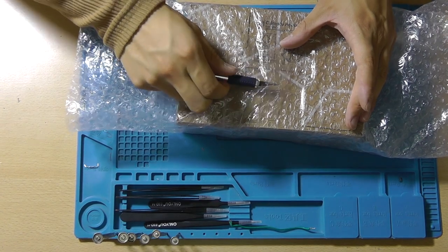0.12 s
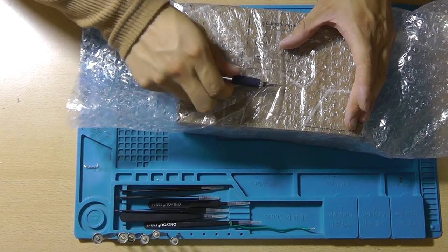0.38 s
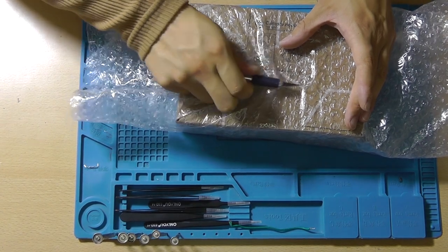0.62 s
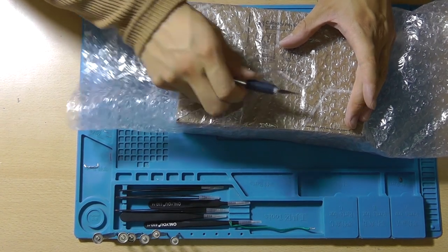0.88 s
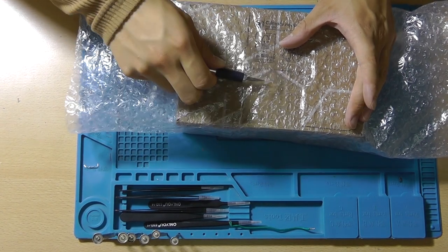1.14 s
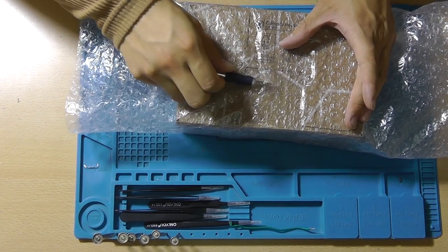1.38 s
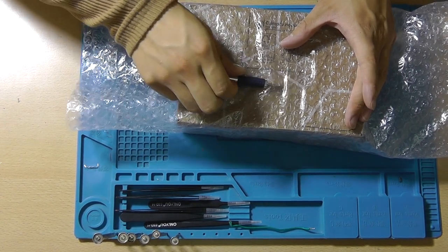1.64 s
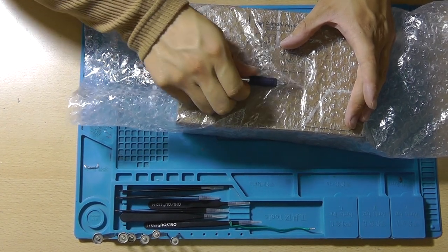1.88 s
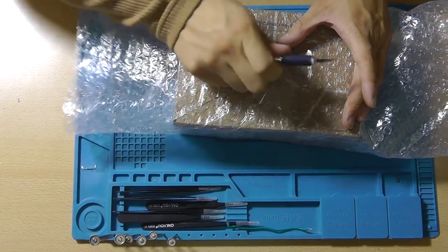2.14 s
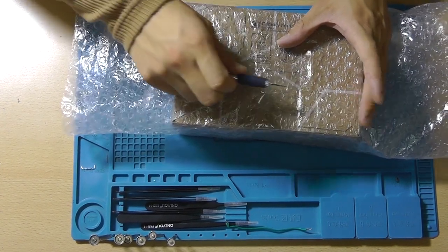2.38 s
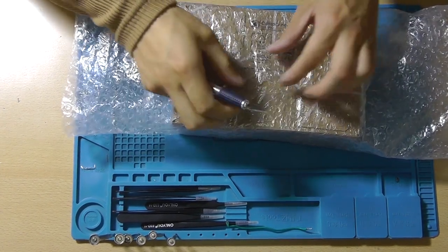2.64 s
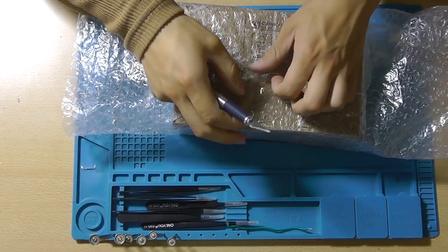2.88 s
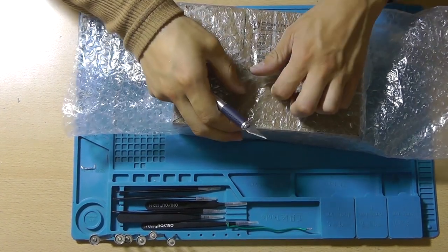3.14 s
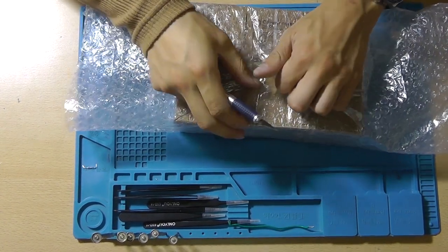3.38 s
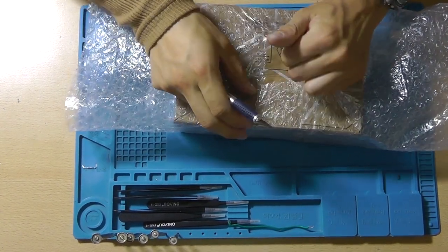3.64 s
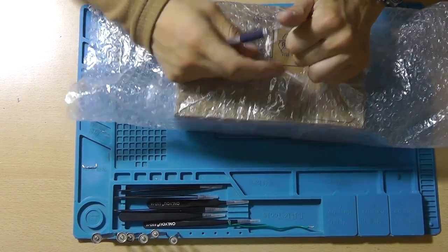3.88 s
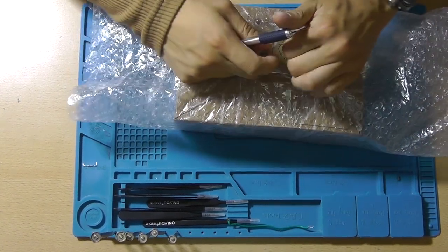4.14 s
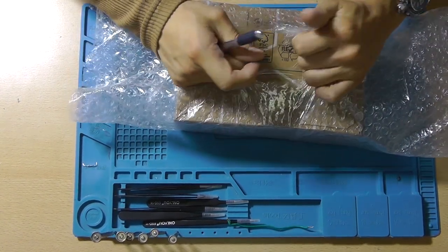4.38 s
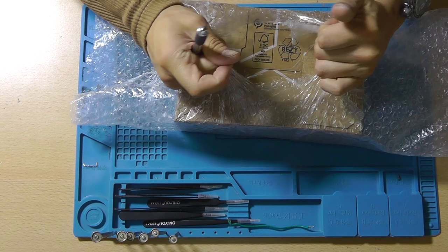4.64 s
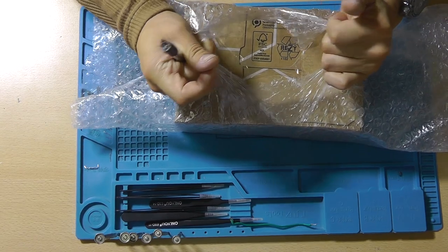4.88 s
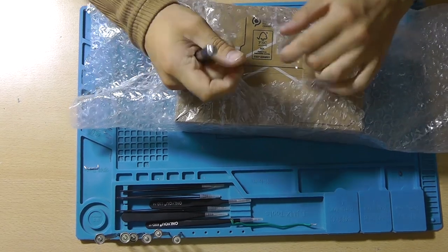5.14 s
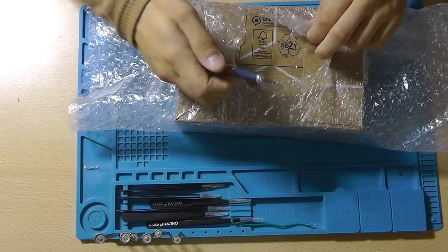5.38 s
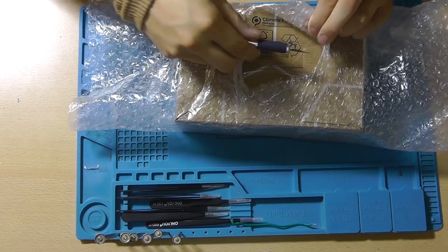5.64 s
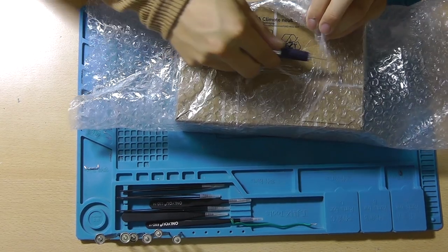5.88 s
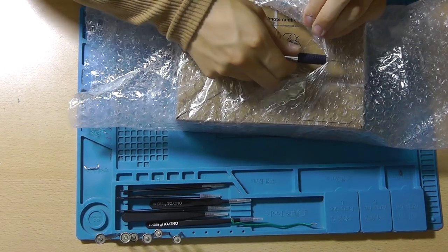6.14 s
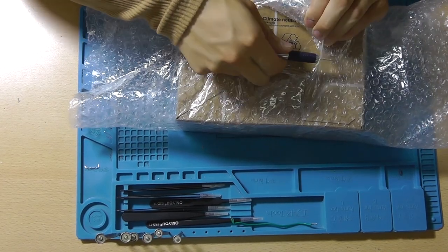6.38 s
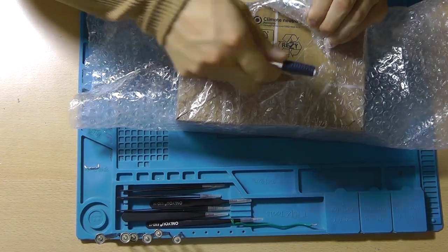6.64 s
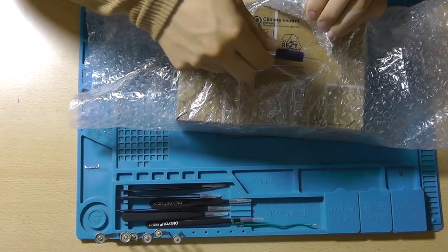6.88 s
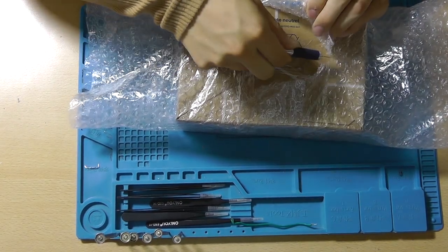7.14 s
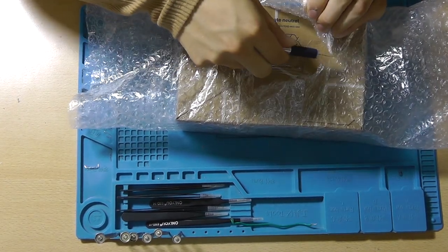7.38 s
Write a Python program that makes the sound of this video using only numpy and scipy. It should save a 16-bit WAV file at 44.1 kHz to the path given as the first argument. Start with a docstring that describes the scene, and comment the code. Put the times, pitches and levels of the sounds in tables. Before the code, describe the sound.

Close, crisp plastic crinkling in uneven clumps, broken by loud pops, two quick knife tears and a tiny squeak, in a small quiet room.

```python
"""Film of bubble wrap crinkles in clumps of tiny buckles, each ringing a patch of film for a few cycles.
Hands press, pull and slit it round a cardboard box on a desk: fractures snap and tear, a stick-slip
squeak sounds once, and the hollow box answers with decaying modes. The loudest snaps overload the input.
Behind: a small room's noise-tail reflections, low desk swings, noise with two hums, a thin sine whine."""
import sys
import numpy as np
from scipy import signal
from scipy.fft import rfft, irfft
from scipy.io import wavfile

SR = 44100
rng = np.random.default_rng(int(sys.argv[2]) if len(sys.argv) > 2 else 0)


def makeup_ratio(level_db):
    """Linear amplitude ratio for a level in decibels (20 dB per factor of ten)."""
    decades = np.asarray(level_db, float) / 20
    return 10 ** decades


def dump(signal):
    """Clip the signal to [-1, 1] and save it as 16-bit WAV at the path in sys.argv[1]."""
    limited = np.clip(np.atleast_2d(signal).T, -1, 1)
    pcm = np.round(limited * 32767).astype(np.int16)
    wavfile.write(sys.argv[1], SR, pcm)


N = 331057

# modes of the box: f/Hz, relative level/dB, full t60/s
BOX_MODES = [(183, -2, .06), (300, -2, .04), (400, -1, .09), (550, 0, .028), (730, -5, .02),
             (950, -4, .025)]


def in_time(rows):
    """Columns of a table, joined by straight lines, one value a sample."""
    s, *columns = np.transpose(rows)
    return [np.interp(np.arange(N) / SR, s, c) for c in columns]


def rms_one(x):
    """Scale to rms 1."""
    return x / np.sqrt(np.mean(x ** 2) + 1e-20)


def at_hz(points, hz):
    """Read a spectrum on a log-frequency axis."""
    points_hz, points_db = np.transpose(points)
    return np.interp(np.log(hz), np.log(points_hz), points_db)


def drift(corner_hz):
    """Slow random wander of rms 1: noise through two equal poles, run at SR / 20."""
    r = np.exp(-40 * np.pi * corner_hz / SR)
    noise = rng.standard_normal(N // 20 + 2002)
    slow = signal.lfilter([1], [1, -2 * r, r * r], noise)[2000:]
    return np.interp(np.arange(N) / 20, np.arange(len(slow)), rms_one(slow))


def ring(clicks, hz, t60_s):
    """Two-pole resonance: a unit click sets a decaying sine of starting height 1 ringing."""
    r = makeup_ratio(-60 / (t60_s * SR))
    w = 2 * np.pi * min(hz, 18000) / SR
    return signal.lfilter([0, np.sin(w)], [1, -2 * r * np.cos(w), r * r], clicks + 1e-18)


def buckles(per_s, spread_db, clump_db):
    """Random clicks of very uneven size that come in clumps."""
    sizes = makeup_ratio(spread_db * np.minimum(rng.exponential(1, N), 5)) * rng.choice([-1, 1], N)
    chance = per_s * makeup_ratio(clump_db * drift(50)) / SR
    return sizes * (rng.random(N) < chance)


def handling():
    """Powers of steady handling and swelling, fading squeezes add: crinkle dB, brightness, rustle dB."""
    # steady handling of the wrap: t/s, crinkle level/dB, brightness/(dB/octave)
    steady = [(0.0, -37.5, -2.5), (0.3, -44, -3), (0.41, -34.5, -2), (0.64, -33.5, -9), (0.87, -49, -3),
              (1.05, -50, -11), (1.19, -48, -11), (1.24, -41, -2.5), (1.6, -38, -2), (2.06, -40.5, -3),
              (2.27, -48, 0.5), (2.55, -40, -7.5), (2.76, -56.5, -9.5), (2.81, -35.5, -1), (3.2, -39, -3),
              (3.4, -35.5, -6.5), (3.99, -35, -5), (4.2, -28, -3.5), (4.87, -34, -3.5), (5.79, -39, -3),
              (6.35, -38, -1), (6.79, -43, -2.5), (7.06, -44, -6.5), (7.5, -40, 0.5)]
    # fingers squeeze or tug: t/s, crinkle level/dB, 10 dB fade/s, brightness/(dB/octave), rustle level/dB
    squeezes = [(0.2, -39, 0.06, -6.5, -45), (0.72, -32, 0.17, 0, -47), (0.95, -29, 0.01, -5, -63),
                (1.819, -32.5, 0.17, -3, -46.5), (2.16, -41.5, 0.16, -8, -42),
                (2.628, -35.5, .08, -1.5, -52), (2.842, -29, 0.04, -8, -35), (3.045, -25.5, 0.06, -7, -42),
                (3.291, -25.5, 0.0744, -2.5, -36), (3.418, -31, 0.03, -4.5, -40.5),
                (3.528, -22, 0.1067, -4, -52), (3.696, -23, 0.0528, -6, -49),
                (3.88, -25.5, 0.12, -1.5, -57), (4.13, -26, 0.02, 0, -42), (4.29, -27.5, 0.07, -7, -61),
                (4.459, -26, 0.08, -1.2, -62), (4.701, -26.5, 0.14, 0, -48), (4.601, -31, 0.05, -1, -66),
                (4.99, -34, 0.04, 0.5, -68), (5.208, -26, 0.1, -5, -43.5), (5.381, -29.5, 0.08, -3.5, -49),
                (5.64, -32.5, 0.18, -4, -54), (6.08, -29.5, 0.16, -9.5, -55)]
    rise_share = 0.72   # rise time over fade time
    drag_db = -21   # rustle against steady crinkle
    t = np.arange(N) / SR
    steady_db, tilt = in_time(steady)
    film_power = makeup_ratio(2 * steady_db)
    box_power = makeup_ratio(2 * (steady_db + drag_db))
    tilt = tilt * film_power
    for s, db, fade_s, brightness, box_db in squeezes:
        shape = makeup_ratio(-20 * np.maximum(t - s, (s - t) / rise_share) / fade_s)
        squeeze_power = makeup_ratio(2 * db) * shape
        film_power = film_power + squeeze_power
        box_power = box_power + makeup_ratio(2 * box_db) * shape
        tilt = tilt + brightness * squeeze_power
    return 10 * np.log10(film_power), tilt / film_power, 10 * np.log10(box_power)


def crinkle(level_db, brightness):
    """Buckles ring patches of film for a few cycles; harder handling, more buckles."""
    # film spectrum: f/Hz, relative level/(dB per Hz)
    film_spectrum = [(410, -37), (700, -27), (1500, -10.5), (2190, -21), (2630, -8.5), (6320, -11),
                     (8100, -1.5), (9600, -18.5), (13300, -16), (16000, -26)]
    # taut film breaks into lone creases, loose film rustles densely: t/s, crispness/dB
    crispness = [(0.0, 4), (2.7, 4), (2.85, -4), (5.6, -4), (5.9, 3), (7.5, 4)]
    crisp_db, = in_time(crispness)
    per_s = 3000 * makeup_ratio(.6 * (level_db + 36) - crisp_db)
    clicks = rms_one(buckles(per_s, spread_db=3.6, clump_db=2.8) / np.sqrt(per_s))
    creases = rms_one(buckles(per_s=55, spread_db=3.0, clump_db=3.0))
    ticks = .24 * makeup_ratio(crisp_db) * creases   # lone creases crack across the whole sheet
    pitches_hz = np.geomspace(800, 15000, 22)
    dealt = rng.integers(0, len(pitches_hz), N)
    out, power = 0, 0
    for k, hz in enumerate(pitches_hz):
        struck = clicks * (.11 + (dealt == k)) + ticks   # own buckles, a share of all, creases
        patch = rms_one(ring(struck, hz, 6.0 / hz)) * (-1) ** k
        gain = np.sqrt(hz) * makeup_ratio(at_hz(film_spectrum, hz) + brightness * np.log2(hz / 3000))
        patchy = makeup_ratio(2.2 * drift(15))
        out = out + gain * patchy * patch
        power = power + gain ** 2
    return makeup_ratio(level_db) * out / np.sqrt(power)


def snaps():
    """A snap is a few quick fractures that ring the film, tick in the treble and knock the box."""
    # film snaps: t/s, peak/dB, film f/Hz, treble tick/dB re film ring, box knock/dB re snap
    single = [(0.192, -18, 2840, -23, -22), (0.3824, -17.5, 2820, -19, -9.5),
              (0.3987, -11.5, 3160, -29, -17.5), (0.4473, -14.5, 3000, -13, -36),
              (0.4719, -9.5, 4000, -27, -2.5), (0.4855, -17, 4010, -26, -17),
              (0.5083, -3.5, 5070, -31, -11.5), (0.5187, -3.5, 4230, -31, -34),
              (0.5645, 1.5, 3070, -46, -6.5), (0.6617, -20, 2860, -12, -17),
              (0.7017, -7.5, 2820, -22, -16.5), (0.802, -19, 3340, -29, -5),
              (1.233, -16.5, 4160, -7.5, -20), (1.381, -18.5, 4800, -15, -23), (1.49, -19, 3250, -2.5, -11),
              (1.627, -12, 5870, -36, -13), (1.7257, -14.5, 5370, -21, -8.5), (1.737, -14, 3130, -1, -8),
              (1.803, -18, 2900, -8, -6.5), (1.9397, -21, 3600, 3, -26), (2.102, -12.5, 2720, -13, -13),
              (2.1175, -16, 2830, -23, -1), (2.3064, -23.5, 1010, -4, -6), (2.8567, -15, 1010, -10, -9),
              (2.9985, -15, 1220, -11, -18), (3.088, -25, 3000, 2, -25), (3.056, -13.5, 2810, -7, -4.5),
              (3.2463, -12.5, 4370, 5, -19), (3.279, -10.5, 3400, 0, -14), (3.2915, -13, 5570, -7, -26),
              (3.4152, -7, 3940, -14, -16), (3.5994, -5, 3100, 1.5, -24), (3.6923, -2.5, 1000, -3, -12),
              (3.6995, -7.5, 3080, -18, -6.5), (3.8405, -13, 2580, -3, -12), (3.9302, -18, 5400, -10, -34),
              (3.9705, -20, 6530, -2, -27), (3.7032, -8.5, 3170, -5, -6.5), (4.1112, -11, 3000, 0, -34),
              (4.1232, -15, 3500, -10, -26), (4.153, -21, 6500, -4, -28), (4.2437, -10, 2600, -5, -31),
              (4.2762, -10.5, 2630, -8, -20), (4.412, -12.5, 2890, 2, -33), (4.5459, -12.5, 3530, -6, -34),
              (4.714, -6.5, 1730, 4.5, -15), (4.7838, -9.5, 1230, 0.5, -24), (4.995, -10.5, 1740, -5, -37),
              (5.033, -18, 1550, -16, -26), (5.178, -8.5, 1010, 5, -9), (5.365, -13, 1160, -23, -21),
              (5.379, -17, 2600, -16, -26), (5.3881, -21, 2000, -15, -22), (5.831, -13.5, 1370, 6.5, -21),
              (5.974, -9.5, 2360, -7, -19), (6.0222, -13, 4800, -21, -13), (6.0614, -13, 3480, -26, -37),
              (6.0906, -5, 2280, -15, -33), (6.1075, 3.5, 2280, -5.5, -14.5),
              (6.119, -16.5, 2170, -18, -12), (6.2475, -21, 2600, 0, -28), (6.403, 0, 2150, -16, -16),
              (6.4496, -11.5, 1420, -24, -7.5), (6.6294, -10, 2420, -22, -21),
              (6.6419, -14, 1650, -26, -17), (7.0168, -23.5, 2070, 5, -34), (7.1257, -20.5, 5230, -22, -24)]
    # knife tears: t/s, first peak/dB, first film f/Hz, box knock/dB re each snap, snaps in the run
    tears = [(2.1218, 1.5, 2920, -11, 5), (6.656, 5, 1950, -9, 3)]
    gap_s, slowing, loss_db, tear_tick_db = .0018, 1.25, 2.5, -6.5
    slackens = 0.99   # pitch of each snap over the one before
    lid = knock(614)   # snaps strike the lid near this pitch, Hz
    torn = []
    for s, db, hz, knock_db, count in tears:
        for k in range(round(count)):
            at_s = s + gap_s * k ** slowing
            torn.append((at_s, db - loss_db * k, hz * slackens ** k, tear_tick_db, knock_db))
    events = list(single) + torn
    out, t = np.zeros(N + SR), np.arange(SR // 10) / SR
    chance = rng.standard_normal((len(events), 2, len(t)))
    soft = signal.butter(2, 7000, fs=SR, output="sos")   # a fracture takes a moment to run
    tick = signal.butter(2, [5000, 14000], "band", fs=SR, output="sos")
    for (s, peak_db, hz, tick_db, knock_db), (size, odds) in zip(events, chance):
        fractures = size * (odds > 1.3) * np.exp(-t / .0009)
        fractures[0] = 1.3
        pushed = np.diff(fractures, prepend=0)   # thin film pushes little air at low pitch
        pushed = signal.sosfilt(soft, pushed)
        film = ring(pushed, hz, 5.5 / hz) + .5 * ring(pushed, 1.5 * hz, 4.0 / hz)
        treble = signal.sosfilt(tick, fractures)
        crack = film / np.abs(film).max() + makeup_ratio(tick_db) * treble / np.abs(treble).max()
        at = round(s * SR)
        out[at:at + len(t)] += makeup_ratio(peak_db) * (crack / np.abs(crack).max() + makeup_ratio(knock_db) * lid)
    return out[:N]


def squeak():
    """Skin slips on film: uneven stick-slip pulses, rich in overtones, through three film resonances."""
    # t/s, slip rate/Hz, level/dB
    slip_track = [(3.857, 1456, -34), (3.868, 1337, -25.5), (3.886, 1697, -23.5), (3.897, 1676, -37),
                  (3.9, 1480, -29), (3.908, 1583, -29), (3.911, 1310, -29.5), (3.932, 1270, -50)]
    hz, level_db = in_time(slip_track)
    cycles = np.cumsum(hz * (1 + 0.035 * drift(200))) / SR
    slips = np.diff(np.floor(cycles), prepend=0) * makeup_ratio(2.2 * drift(370))
    slips = np.diff(slips, prepend=0)
    n = np.arange(N)
    sounding = (n > slip_track[0][0] * SR) & (n < slip_track[-1][0] * SR)
    film = ring(slips, 2500, 0.0028) + 0.55 * ring(slips, 1360, 0.0047) + 0.43 * ring(slips, 7300, 0.0014)
    return makeup_ratio(level_db) * sounding * rms_one(film)


def box_rustle(level_db):
    """Film dragged over the cardboard drums softly on the box, its modes damped to 0.26 of full t60."""
    clicks = buckles(per_s=400, spread_db=2.0, clump_db=2.5)
    modes = [makeup_ratio(db) * ring(clicks * rng.standard_normal(N), hz, 0.26 * t60_s)
             for hz, db, t60_s in BOX_MODES]
    return makeup_ratio(level_db) * rms_one(sum(modes))


def knock(spot_hz):
    """One blow on the box; the struck spot favours the modes near its own pitch; height 1."""
    blow = np.arange(SR // 10) == SR // 1000
    x = 0
    for hz, db, t60_s in BOX_MODES:
        favour_db = -26.0 * abs(np.log2(hz / spot_hz))
        x = x + makeup_ratio(db + favour_db) * ring(blow, hz, t60_s)
    return x / np.abs(x).max()


def bumps():
    """A hand bumps the box: dull blows that ring its modes."""
    # t/s, peak/dB, struck spot f/Hz
    blows = [(0.204, -15, 583), (2.8414, -38, 455), (2.8571, -16, 1000), (2.933, -23.5, 510),
             (2.998, -20, 960), (3.043, -21, 950), (3.0498, -28, 450), (3.2915, -17.5, 180),
             (3.693, -11, 950), (3.704, -19, 760), (4.41, -34, 180), (4.7165, -9, 345), (4.733, -25, 300),
             (4.759, -28, 400), (4.775, -24, 392), (5.939, -24.5, 950), (6.6587, -12, 960)]
    out = np.zeros(N + SR)
    for s, db, hz in blows:
        at = round(s * SR)
        out[at:at + SR // 10] += makeup_ratio(db) * knock(hz)
    return out[:N]


def room(x):
    """Dense reflections: a dying noise tail; the box's near, low knock hardly reaches the walls."""
    t60_s, level_db, reach_hz, wall_cut_hz = 0.32, -10.5, 1450, 14600
    t = np.arange(SR // 2) / SR
    tail = rng.standard_normal(len(t)) * makeup_ratio(-60 * t / t60_s) * (t > .003)
    band = signal.butter(1, [reach_hz, wall_cut_hz], "band", fs=SR, output="sos")
    tail = signal.sosfilt(band, tail)
    tail = tail / np.sqrt(np.sum(tail ** 2))   # unit energy
    return makeup_ratio(level_db) * signal.fftconvolve(x, tail)[:N]


def desk():
    """An arm shakes the desk: the top swings a few low cycles, swelling and fading."""
    # t/s, level/dB
    shakes = [(2.22, -36.5), (2.309, -52), (3.39, -75), (3.649, -38), (4.202, -33), (4.798, -34.5),
              (6.86, -53)]
    swing_hz, shake_s = 45.3, 0.023
    t = np.arange(N) / SR
    out = np.zeros(N)
    for s, db in shakes:
        swell = np.exp(-((t - s) / shake_s) ** 2)
        out += makeup_ratio(db) * np.sqrt(2) * swell * np.sin(2 * np.pi * swing_hz * (t - s))
    return out


def wavering(hz, width_hz):
    """Noise twice through one resonance: a tone that wavers; rms 1."""
    t60_s = np.log(1000) / (np.pi * width_hz)
    once = ring(rng.standard_normal(N), hz, t60_s)
    return rms_one(ring(once, hz, t60_s))


def air():
    """Steady room noise, shaped by its spectrum, with two wavering hums."""
    # room noise: f/Hz, relative level/(dB per Hz)
    noise_spectrum = [(30, -50), (60, -8), (110, -7), (200, -8), (300, -13), (550, -11), (1200, -14),
                      (2500, -23), (5000, -33), (11000, -43), (16000, -47)]
    # hums: f/Hz, width/Hz, rms level/dB
    hums = [(48.36, 4.1, -52), (185.6, 8.1, -54)]
    noise_db = -50
    hz = np.maximum(np.arange(N // 2 + 1) * SR / N, 1)
    noise = irfft(rfft(rng.standard_normal(N)) * makeup_ratio(at_hz(noise_spectrum, hz)), N)
    hum = sum(makeup_ratio(db) * wavering(f, width_hz) for f, width_hz, db in hums)
    return makeup_ratio(noise_db) * rms_one(noise) + hum


def whine():
    """Thin electronic whine: a sine of wandering phase, stronger in the second channel."""
    whine_hz, level_db, pan_db = 13507, -55.5, -6
    phase = 2 * np.pi * whine_hz * np.arange(N) / SR + 1.9 * drift(3.3)
    return makeup_ratio(level_db) * np.sqrt(2) * np.sin(phase) * makeup_ratio(pan_db * np.array([[.5], [-.5]]))


def scene():
    """One microphone feeds both channels; only the whine differs."""
    crinkle_db, brightness, box_db = handling()
    wrap = crinkle(crinkle_db, brightness) + box_rustle(box_db) + snaps() + bumps() + squeak()
    no_bass = signal.butter(2, 130, "high", fs=SR, output="sos")   # a small parcel radiates no deep bass
    wrap = signal.sosfilt(no_bass, wrap)
    return wrap + room(wrap) + desk() + air() + whine()


def roll_off(x):
    """The treble ends steeply here."""
    return signal.sosfilt(signal.butter(12, 16690, fs=SR, output="sos"), x)


def record(dry):
    """Overload flattens peaks and knocks the input's resting level down; it creeps back and overshoots."""
    top, sag_depth, sag_s, coupling_hz, stop_hz = 1.0, .115, .04, .6, 16200
    t = np.arange(N) / SR
    overload_s = np.where(np.abs(dry) > .95 * top, t, -9.)
    last_overload_s = np.maximum.accumulate(overload_s, axis=1)
    sag = -sag_depth * np.exp((last_overload_s - t) / sag_s)
    sag = signal.lfilter([.006], [1, -.994], sag)   # softens the onset
    coupling = signal.butter(1, coupling_hz, "high", fs=SR, output="sos")   # makes the overshoot
    sag = signal.sosfilt(coupling, sag)
    clipped = np.clip(dry + sag, -top, top)
    treble_cut = signal.cheby2(10, 40, stop_hz, fs=SR, output="sos")
    return roll_off(signal.sosfilt(treble_cut, clipped))


dry = scene()
out = record(dry)
dump(out)
```